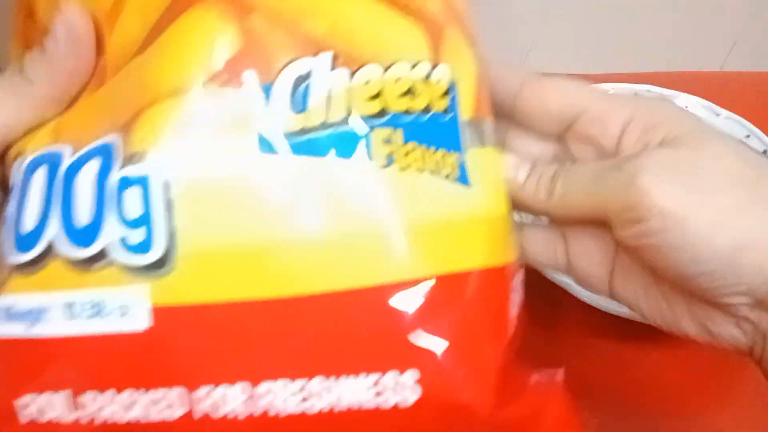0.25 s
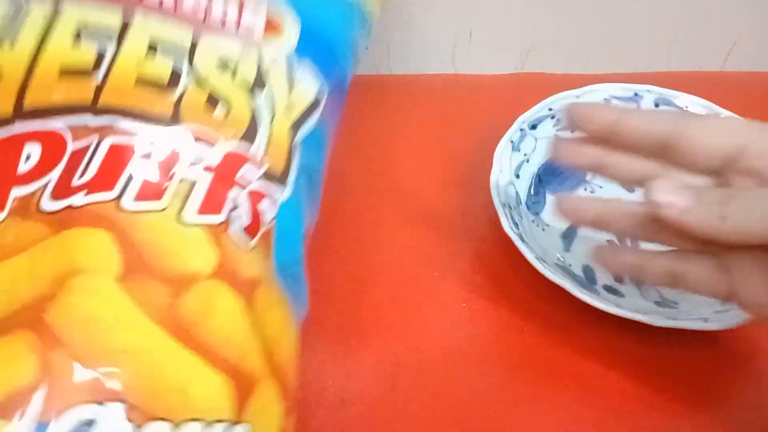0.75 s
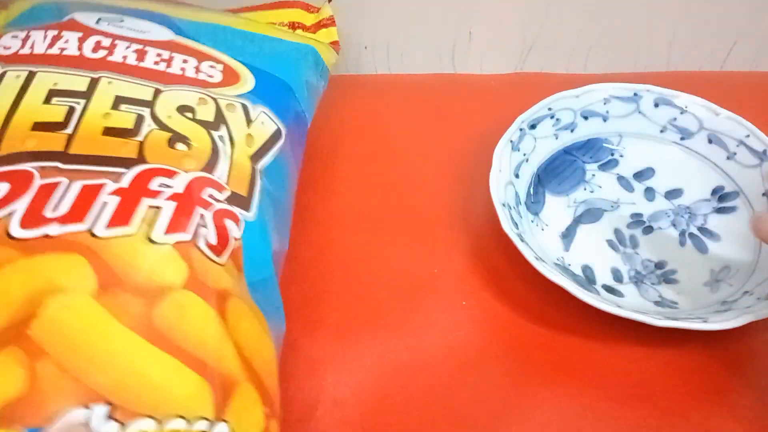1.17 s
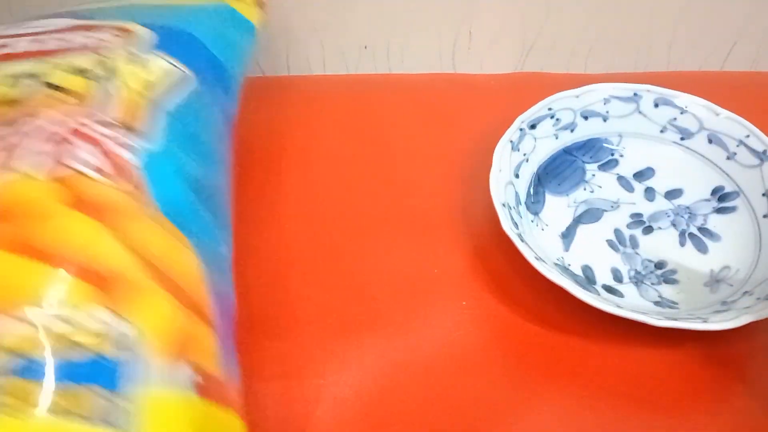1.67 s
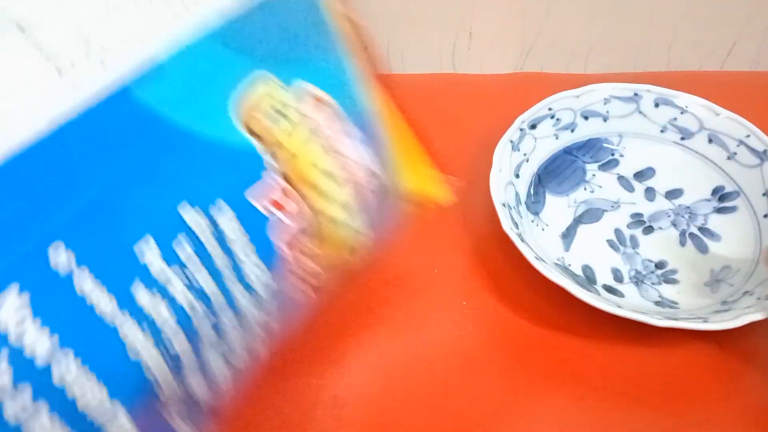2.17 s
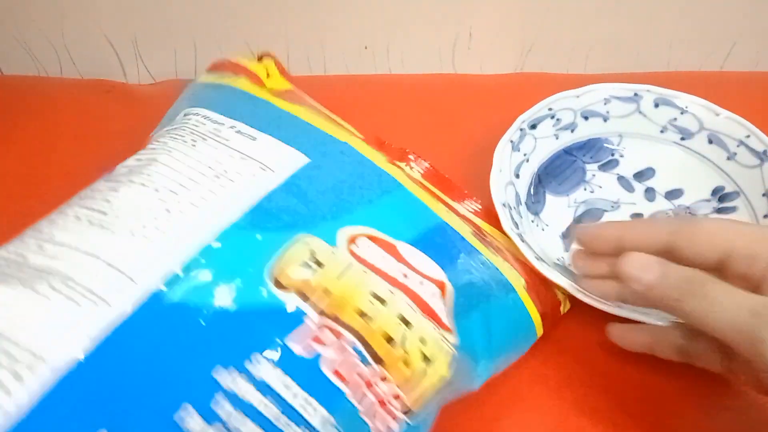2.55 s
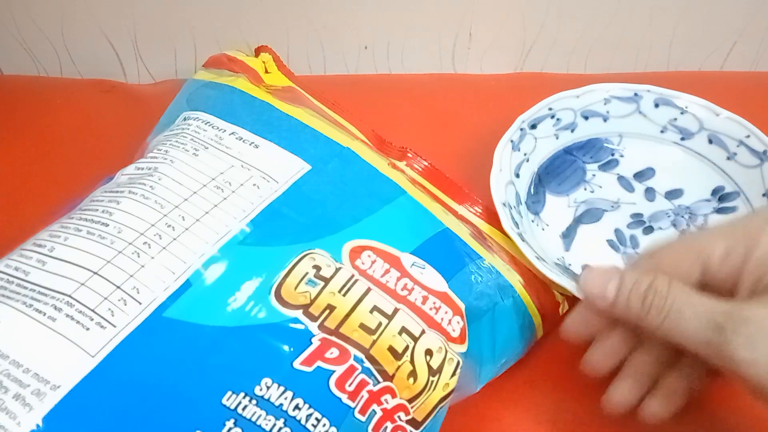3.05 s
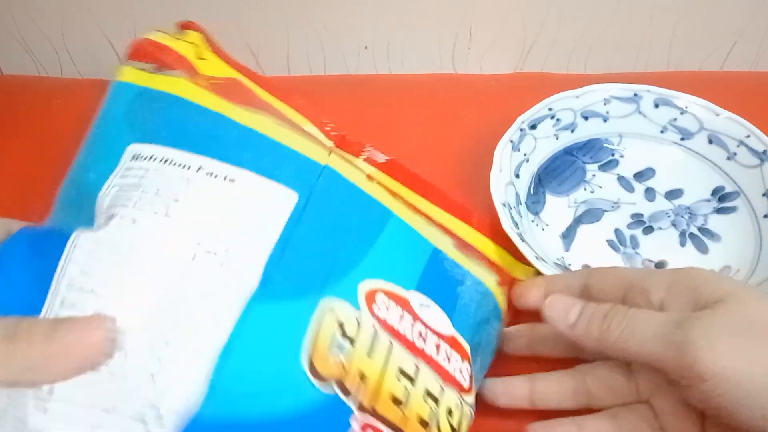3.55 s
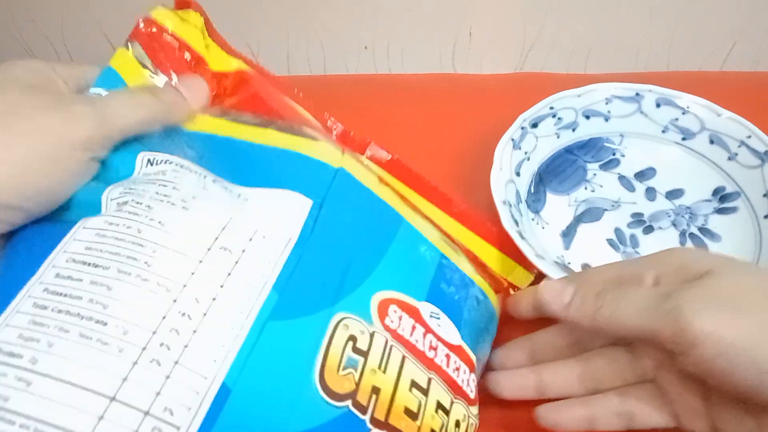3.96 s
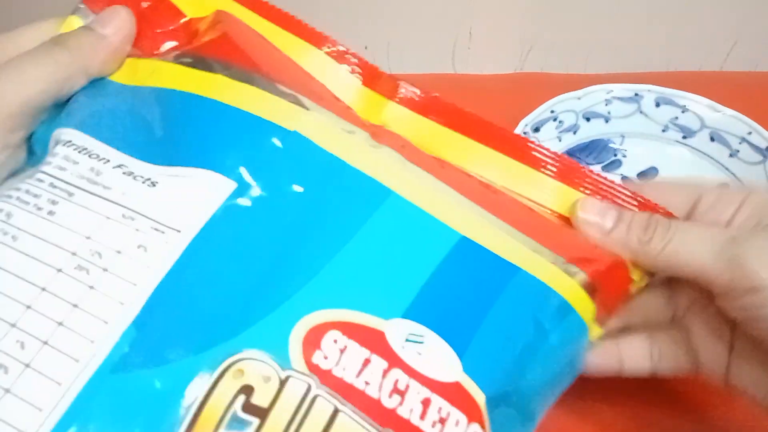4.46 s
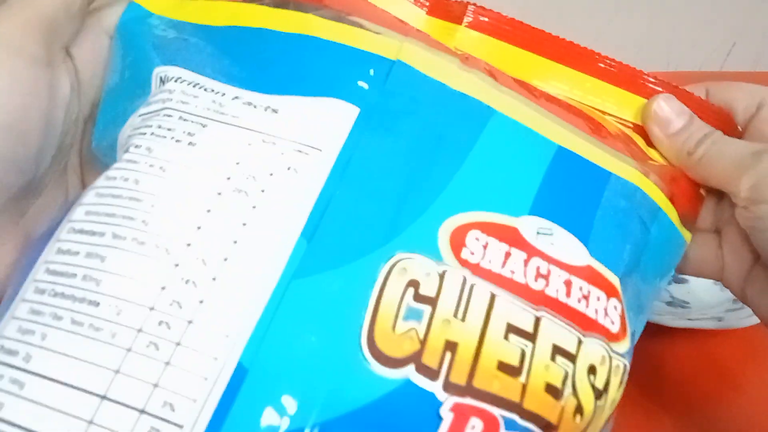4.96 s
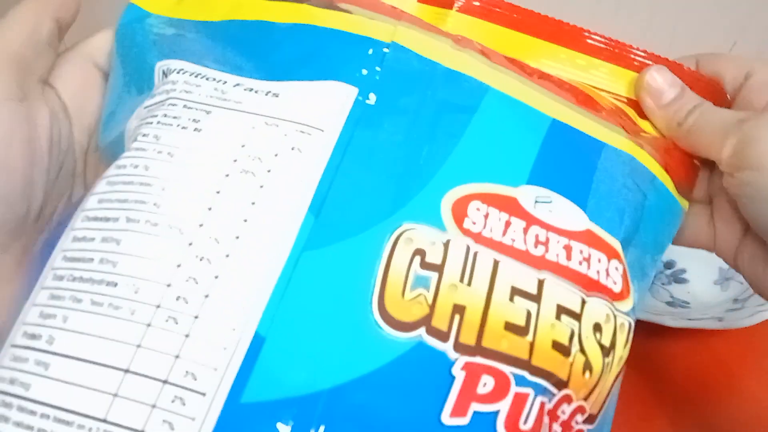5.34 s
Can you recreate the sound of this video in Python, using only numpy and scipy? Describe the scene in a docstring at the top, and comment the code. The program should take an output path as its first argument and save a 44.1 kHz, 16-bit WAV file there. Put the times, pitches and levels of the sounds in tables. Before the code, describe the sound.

A puffed-up foil snack bag is handled close up, crackling in sharp uneven bursts with soft low air thuds between near-quiet pauses.

```python
"""A soft thud of sealed air comes first, with faint crinkling: a puffed-up foil snack bag is lifted,
turned over and gripped close to a microphone in a small room. Creases snap as noise bursts ringing their
panels and folds, over a finer crinkle of tiny grains and the hiss of sliding fingers. The air inside thuds
as sagging low tones and rumbles as shaped noise when hands and table bump it. At the end single creases pop."""
import sys
import numpy as np
from scipy import signal
from scipy.fft import rfft, irfft
from scipy.io import wavfile
from scipy.ndimage import uniform_filter1d

SR = 44100
rng = np.random.default_rng(int(sys.argv[2]) if len(sys.argv) > 2 else 0)


def output_pcm(signal):
    """Save a mono or channel-first signal as 16-bit PCM at the path in sys.argv[1].

    Samples are clipped to [-1, 1] before scaling.
    """
    pcm = np.clip(np.atleast_2d(signal).T, -1, 1) * 32767
    wavfile.write(sys.argv[1], SR, np.round(pcm).astype(np.int16))


N = 246959

# slackness of the film, loose wide panels add depth and a taut bag has none:
# time_s, low_note_gain_db (on the lowest panel notes)
SLACKNESS = [(0, -8), (.8, -0.5), (1, -12), (1.3, -1), (1.9, -6), (2.35, 3.5), (2.7, -2.5), (3.2, -7),
             (3.5, -2.5), (3.85, -2.5), (4.05, 0), (4.45, 0), (4.62, -3.5), (4.7, 1.5), (4.76, -6),
             (4.93, -1), (5.2, -8.5), (5.6, -10)]
PANEL_HZ = 1400  # pitch of a middling panel


def amp(db):
    """Turns dB into a factor on the amplitude."""
    return 10 ** (np.asarray(db) / 20)


def evened(x):
    """Scales to rms 1 along the last axis."""
    return x / np.sqrt(np.mean(x ** 2, -1, keepdims=True) + 1e-20)


def smoothed(x, first, second):
    """Runs two moving averages, of first and second samples."""
    return uniform_filter1d(uniform_filter1d(x, first), second)


def steadied(x, size):
    """Holds the rms near 1 over stretches of about size samples and keeps the finer grain."""
    power = smoothed(x ** 2, size, size)
    return x / np.sqrt(abs(power) + 1e-6 * np.mean(x ** 2))


def read(points, hz):
    """Reads a spectrum joined by straight lines on a log-frequency axis."""
    point_hz, value = np.transpose(points)
    return np.interp(np.log(hz + 1), np.log(point_hz + 1), value)


def tinted(x, points):
    """Gives x the colour of a spectrum."""
    hz = np.fft.rfftfreq(len(x), 1 / SR)
    return irfft(rfft(x) * amp(read(points, hz)), len(x))


def ringing(x, hz, q):
    """One resonance of gain 1 at its peak."""
    return signal.lfilter(*signal.iirpeak(min(hz, SR * .45), max(q, 1), fs=SR), x)


def add(mix, s, sound):
    """Mixes a sound in at time s."""
    start = max(round(s * SR), 0)
    part = mix[start:start + len(sound)]
    part += sound[:len(part)]


def per_sample(values):
    """Spreads values evenly over the whole time."""
    return np.interp(np.linspace(0, len(values) - 1, N), np.arange(len(values)), values)


def strokes(rows, attack_s, release_db_per_s):
    """Each move of the hands rises, holds and lets go: rows of power, one value a millisecond."""
    start_s, length_s, level_db = np.transpose(rows)[:3, :, None]
    since_s = np.arange(0, N / SR, .001) - start_s
    rise = np.clip(since_s / attack_s, 0, 1)
    release_db = release_db_per_s * np.maximum(since_s - length_s, 0)
    return (rise * amp(level_db - release_db)) ** 2


def room_hush(level_db=-62.5):
    """The hush of the room: steady noise in a fixed colour."""
    # colour of the hush: frequency_hz, density_db (relative, per Hz)
    hush_colour = [(18, -48), (30, -14), (109, 13.5), (295, -12), (632, 0.5), (702, -24), (822, -18),
                   (1960, -8), (2170, -28), (2980, -33.5), (4080, -46), (5450, -16), (6210, -28),
                   (8520, -17.5), (16000, -85)]
    return amp(level_db) * evened(tinted(rng.standard_normal(N), hush_colour))


def room(x, first_ms=4):
    """Dense reflections from table and walls, each band dying at its own speed."""
    # reverberation: frequency_hz, t60_s (time to fall 60 dB)
    decay_times = [(150, 0.22), (1000, 0.2), (3000, 0.15), (6000, 0.2), (14000, 0.17)]
    size = SR // 2
    sparse = rng.random(size) < .12
    late = np.arange(size) > first_ms * SR / 1000
    taps = rng.standard_normal(size) * sparse * late
    hz, t, bands = signal.stft(taps, SR, nperseg=256)
    fading = amp(-60 * t / read(decay_times, hz)[:, None])
    tail = signal.istft(bands * fading, SR, nperseg=256)[1]
    return signal.fftconvolve(x, tail / np.linalg.norm(tail))[:N]


def rumble(level_db=-1, scuff_db=-10, scuff_hz=330, scuff_q=2.0, hardness=0.86, lumps_db=7.5):
    """Fingers drag and jostle the cushion unevenly between the bumps; a harder push scuffs higher."""
    # pushes on the whole bag: start_s, length_s, level_db (before the lumps and the trim)
    push_rows = [(0.01, 0.041, -36.5), (0.1, 0.11, -32), (0.315, 0.11, -41), (0.5, 0.14, -28),
                 (0.74, .11, -32.5), (0.87, 0.27, -45.5), (1.21, .13, -32), (1.36, 0.66, -37.5),
                 (2.01, 0.31, -29), (2.38, 0.11, -37.5), (2.57, 0.13, -31.5), (3.06, 0.047, -46),
                 (3.22, 0.16, -30), (3.46, 0.15, -37.5), (3.61, 0.025, -26), (3.735, 0.021, -21.5),
                 (3.78, .1, -35), (3.89, .17, -42), (4.1, .1, -66), (4.315, 0.047, -36.5), (4.4, 0.3, -48),
                 (5.49, 0.057, -34.5), (5.565, 0.028, -28)]
    # colour of the air cushion: frequency_hz, density_db (relative, per Hz)
    cushion_colour = [(15, -43.5), (25, -24), (65, 3), (91, 7), (123, 5), (188, -2), (237, -1),
                      (313, -21.5), (450, -43), (580, -109), (990, -120)]
    settled_db = -72  # the bag between pushes
    power = strokes(push_rows, attack_s=0.012, release_db_per_s=305).sum(0) + amp(settled_db) ** 2
    jostle_db = per_sample(10 * np.log10(power))
    deep = steadied(tinted(rng.standard_normal(N), cushion_colour), size=1000)
    scuff = rng.standard_normal(N)
    for _ in range(3):
        scuff = ringing(scuff, scuff_hz, scuff_q)
    scuff_gain = amp(scuff_db + hardness * (jostle_db + 18.5))
    lumps = evened(smoothed(rng.standard_normal(N), 700, 500))
    uneven = amp(level_db + jostle_db + lumps_db * np.tanh(lumps))
    return uneven * (deep + scuff_gain * evened(scuff))


def thuds(swell_ms=4.78, sag=0.35, skin_db=-14, skin_ratio=1.8, skin_ms=7):
    """A push on the sealed air: a few low cycles that sag in pitch, and a short higher mode of the taut skin."""
    # bumps on the air cushion: time_s, level_db (crest of the air tone), pitch_hz (middle of the sag)
    bump_rows = [(0.032, -17.5, 140), (0.167, -24.5, 140), (0.187, -20.5, 151), (0.32, -21.5, 100),
                 (0.545, -17, 123), (0.589, -18, 155), (0.631, -16.5, 117), (0.751, -19.5, 145),
                 (0.783, -11, 133), (0.83, -16.5, 164), (1.265, -18.5, 147), (1.837, -19.5, 135),
                 (2.014, -15.5, 151), (2.04, -12, 132), (2.074, -14.5, 156), (2.139, -16.5, 118),
                 (2.189, -14, 112), (2.229, -17, 195), (2.266, -13.5, 107), (2.301, -17, 111),
                 (2.286, -24, 102), (2.396, -16.5, 144), (2.56, -24, 180), (2.604, -15, 119),
                 (2.654, -30, 133), (2.691, -19.5, 119), (3.1, -32.5, 112.7), (3.255, -14, 190),
                 (3.362, -17.5, 160), (3.379, -18, 170), (3.629, -19.5, 172), (3.74, -5, 181),
                 (3.777, -14, 150), (3.795, -16.5, 175), (3.927, -19, 312), (5.589, -18, 117)]
    out = np.zeros(N)
    t = np.arange(SR // 12) / SR
    ms = t * 1000
    u = ms / swell_ms
    swell = (u * np.exp(1 - u)) ** 2.7
    sagging = 1 + sag * (2 * np.exp(-u / 2) - 1)
    for s, db, hz in bump_rows:
        turns = np.cumsum(hz * sagging) / SR
        air = np.sin(2 * np.pi * (turns + rng.random()))
        skin = np.sin(2 * np.pi * (skin_ratio * turns + rng.random()))
        skin = amp(skin_db) * np.exp(-ms / skin_ms) * skin
        add(out, s - .002, amp(db) * swell * (air + skin))
    return out


def squeaks(waver=0.019, rough=0.45):
    """Skin sticks and slips on the film in a short, uneven, wavering tone."""
    # faint thin squeaks as the grip tightens: start_s, length_s, pitch_hz, level_db (rms)
    squeak_rows = [(4.962, 0.14, 1070, -56.5), (5.211, 0.034, 1230, -50.5), (5.556, 0.048, 1770, -58)]
    out = np.zeros(N)
    for s, length_s, hz, db in squeak_rows:
        size = int(length_s * SR)
        drift, catch = evened(uniform_filter1d(rng.standard_normal((2, size)), size=300))
        phase = 2 * np.pi * np.cumsum(hz * (1 + waver * drift)) / SR
        tone = np.sin(phase) * (1 + rough * catch)
        add(out, s, amp(db) * evened(tone * signal.windows.tukey(size, .4)))
    return out


def film_zones(x, low_hz=340):
    """Colours x as the film radiates it and splits it into body, mid, edge and air."""
    # colour of the film: frequency_hz, density_db (relative, per Hz)
    film_colour = [(150, -22.5), (250, 10.5), (414, 3), (476, -1.5), (586, -2), (831, -1), (1060, -2.5),
                   (1500, -2.5), (2320, -8), (3340, -2), (4190, -1), (5630, 0.5), (9330, -8.5), (14900, -8),
                   (16000, -7.5)]
    # broad resonances that colour every crackle: frequency_hz, width_hz, gain_db
    resonances = [(3560, 560, -1), (4200, 540, -5.5), (5850, 4500, -1.5), (7240, 460, 0.5),
                  (8320, 740, 3.5)]
    # centres of body, mid, edge and air: frequency_hz
    centres_hz = [800, 2400, 6000, 12000]
    hz = np.fft.rfftfreq(len(x), 1 / SR)
    colour_db = read(film_colour, hz)
    for centre_hz, width_hz, db in resonances:
        colour_db = colour_db + db * np.exp(-((hz - centre_hz) / width_hz) ** 2)
    low_cut = 1 / np.sqrt(1 + (low_hz / (hz + 1)) ** 10)
    spectrum = rfft(x) * amp(colour_db) * low_cut
    # neighbouring zones cross-fade
    shares = [np.interp(np.log(hz + 1), np.log(centres_hz), w) for w in np.eye(len(centres_hz))]
    return np.array([irfft(spectrum * share, len(x)) for share in shares])


def buckle(decay_ms, flutter, after_db=-21, after_ms=5, size=1024):
    """A crease flips with one impulse; the film flutters briefly and then settles."""
    ms = np.arange(size) * 1000 / SR
    settling = np.exp(-ms / decay_ms) + amp(after_db) * np.exp(-ms / after_ms)
    burst = flutter * rng.standard_normal(size) * settling
    burst[0] += rng.choice([-1, 1])
    return burst


def flexing():
    """How hard the grips flex the film and how brightly it answers, both in dB."""
    # each grip or slide of the hands: start_s, length_s, level_db (drive, before each layer's trim),
    # brightness_db (raises edge and air, lowers body)
    grip_rows = [(0.0, 0.27, -67, -5), (0.113, 0.093, -62, 7), (0.204, 0.078, -55.5, 3.5),
                 (0.289, .05, -56, 6), (0.328, .09, -45, 1), (0.479, .06, -52, 2.5),
                 (0.56, 0.076, -61, 0.5), (0.642, 0.16, -67.5, -2), (0.763, 0.051, -42, -0.5),
                 (0.867, 0.1, -42.5, -1), (1.005, 0.049, -41, 0.5), (1.16, 0.095, -38.5, 0),
                 (1.253, 0.082, -33, 0.5), (1.367, 0.11, -32.5, 2), (1.5, 0.15, -42, 3),
                 (1.636, 0.42, -42, 1.5), (1.796, 0.066, -30, 0), (1.874, 0.12, -33, -1),
                 (1.916, 0.12, -30, 1.5), (2.058, 0.18, -42.5, 1), (2.214, 0.058, -35, 2),
                 (2.31, 0.097, -38, -0.5), (2.426, 0.15, -47.5, 1.5), (2.605, 0.07, -36, -1.5),
                 (3.188, .025, -57, -2), (3.205, 0.045, -40.5, -4.5), (3.25, 0.036, -35.5, 1),
                 (3.302, .11, -39, -1), (3.447, 0.1, -34.5, 0.5), (3.55, 0.069, -38.5, -0.5),
                 (3.621, 0.029, -33.5, -1.5), (3.688, 0.029, -46, -3.5), (3.801, 0.15, -35, -2),
                 (3.892, .15, -32, 0), (4.077, .12, -40, 0.5), (4.218, 0.078, -53, 3),
                 (4.307, 0.021, -35, 1.5), (4.384, 0.2, -44.5, 0), (4.554, 0.079, -43.5, -4),
                 (4.672, 0.038, -45.5, -0.5), (4.739, 0.056, -46.5, 1.5), (4.897, .04, -51, 0.5),
                 (5.498, 0.11, -59.5, -1)]
    resting_db, resting_bright_db = -72, -5  # the film barely creeps in still hands
    power = strokes(grip_rows, attack_s=.02, release_db_per_s=277)
    rest = amp(resting_db) ** 2
    total = power.sum(0) + rest
    bright_db = (np.transpose(grip_rows)[3] @ power + resting_bright_db * rest) / total
    return per_sample(10 * np.log10(total)), per_sample(bright_db)


def cavity(x, depth=2.4, fade_ms=6.2, longest_ms=7, shift_per_s=8, below_hz=3800, count=28):
    """Echoes inside the bag swell and fade as it changes shape, so its resonances keep shifting."""
    t, echoes = np.arange(N) / SR, np.zeros(N)
    delays_ms = (np.arange(count) + rng.random(count)) * longest_ms / count
    weights = np.exp(-delays_ms / fade_ms)
    weights = weights / np.linalg.norm(weights)
    shapes = rng.standard_normal((count, 200))
    for ms, weight, shape in zip(delays_ms, weights, shapes):
        strength = np.interp(t * shift_per_s, np.arange(len(shape)), shape)
        delayed = np.pad(x, (int(ms * SR / 1000) + 1, 0))[:N]
        echoes += weight * strength * delayed
    # the filling soaks up the treble
    soaked = signal.lfilter(*signal.butter(1, min(below_hz, SR * .4), fs=SR), echoes)
    return x + depth * soaked


def slackened(x, corner_hz=680):
    """The lowest notes of the film come and go with its slackness."""
    slack_db = np.interp(np.arange(N) / SR, *np.transpose(SLACKNESS))
    hz = np.fft.rfftfreq(N, 1 / SR)
    lowest = irfft(rfft(x) / (1 + (hz / corner_hz) ** 8), N)
    return x + (amp(slack_db) - 1) * lowest


def crinkle(level_db=-1, body_db=4, edge_db=-0.5, air_db=-7.5, per_s=560, crowding=0.38, spread_db=5,
            slide=0.4, gentle=0.098, grain_ms=0.96, own_db=8, count=32):
    """Swarms of tiny creases, denser as the film flexes harder; a gentle touch mostly slides and hisses."""
    flex_db, bright_db = flexing()
    rate = per_s * amp(crowding * (flex_db + 40.5))
    strikes = rng.random(N) < rate / SR
    clicks = strikes * amp(spread_db * np.minimum(rng.exponential(1, N), 4))
    crease = rng.integers(0, count, N)
    swarm = np.zeros(N)
    for k in range(count):
        # every crease favours a pitch of its own
        own_hz = np.exp(rng.uniform(np.log(700), np.log(11000)))
        grain = buckle(grain_ms * rng.uniform(0.1, 1.8), flutter=0.26)
        grain = grain + amp(own_db) * ringing(grain, own_hz, 7.5)
        swarm += signal.oaconvolve(clicks * (crease == k), evened(grain))[:N]
    hiss = slide * amp(-gentle * (flex_db + 29)) * rng.standard_normal(N)
    inside = cavity(cavity(evened(swarm) + hiss), depth=.5)
    # level steadied first, so that the grips alone shape the loudness
    zones = steadied(film_zones(inside), size=1100)
    balance_db = np.array([body_db - bright_db, np.zeros(N), edge_db + bright_db, air_db + bright_db])
    return amp(level_db) * (amp(flex_db + balance_db) * zones).sum(0)


def snap(s, db, bright_db, top_db, decay_ms, panel_hz, flutter=0.54, panel_db=10, panel_q=8, fold_db=3,
         fold_q=5, fold_lean=.6, slack_hz=370, tautening=0.97, mid_db=-1.0, thinning=0.53, rising=0.25):
    """One large crease rings its panel and its folds: wide panels are deep, small ones thin, tight folds bright."""
    lead, span = 128, .005 * SR  # samples of silence ahead, samples the level refers to
    fold_hz, tight_fold_hz = rng.uniform(0.91, 1.093) * np.array([3300, 5430])
    burst = buckle(max(decay_ms, .1), flutter)
    # the brighter the crease, the more its tight fold leads
    lean = amp(fold_lean * bright_db)
    folds = ringing(burst, fold_hz, fold_q) + lean * ringing(burst, tight_fold_hz, fold_q)
    folds = amp(fold_db) * folds / np.hypot(1, lean)
    burst = burst + amp(panel_db) * ringing(burst, panel_hz, panel_q) + folds
    # the tauter the film and the smaller the panel, the higher its lowest note
    small_db = 20 * np.log10(panel_hz / PANEL_HZ)
    slack_db = np.interp(s, *np.transpose(SLACKNESS))
    lowest_hz = slack_hz * amp(rising * small_db - tautening * slack_db)
    zones = film_zones(np.pad(burst, lead), lowest_hz)
    zones *= np.sqrt(span) / np.linalg.norm(zones, axis=1, keepdims=True)
    thin_db = thinning * small_db
    zones_db = np.array([-bright_db - thin_db, mid_db + thin_db, bright_db, top_db])
    return s - lead / SR, amp(db + zones_db) @ zones


def crackles(spread_db=3, bright_spread_db=4, top_db=-9, top_spread_db=7, decay_ms=1.7, octaves=.7,
             least_db=-66, count=130):
    """Middling creases give way at random while the film is flexed, their levels scattered around the flexing."""
    flex_db, bright_db = flexing()
    out = np.zeros(N)
    for k, (when, size, tilt, top, pitch) in enumerate(rng.uniform(-1, 1, (count, 5))):
        at = int((k + (when + 1) / 2) * N / count)
        s, sound = snap(at / SR,
                        flex_db[at] + spread_db * size,
                        bright_db[at] + bright_spread_db * tilt,
                        top_db + top_spread_db * top,
                        decay_ms,
                        PANEL_HZ * 2 ** (octaves * pitch))
        add(out, s, sound * (flex_db[at] > least_db))
    return out


def snaps():
    """The large creases, one after another."""
    # the loudest buckling creases: time_s, level_db (rms over 5 ms, before the zone balance),
    # brightness_db (raises edge, lowers body), top_treble_db (air relative to the level),
    # decay_ms, pitch_hz (of the panel)
    crease_rows = [(0.2055, -49, 7.5, 6, 1.1, 1650), (0.3492, -43, 12.5, 6, 1.1, 920),
                   (0.3597, -36.5, 9, 0, 2, 1260), (0.3674, -36, 4, -9, 1.8, 1260),
                   (0.4035, -33.5, 2, 3, 1.8, 1350), (0.4116, -33.5, 2.5, -7, 3.6, 1440),
                   (0.7872, -18, -0.5, -2, 1.9, 1076), (0.9383, -33, 0.5, -16, 4, 1520),
                   (1.0634, -35.5, 1, -7.5, 2.7, 1460), (1.1699, -39, -1, -7, 2.3, 1130),
                   (1.2172, -30.5, 6.5, -6.5, 2.6, 1080), (1.2336, -31, 7.5, 6, 1, 2430),
                   (1.2506, -26, -0.5, -10, 1.7, 1190), (1.2795, -24.5, 3.5, -12, 4, 805),
                   (1.2954, -30, 3.5, 0.5, 2.5, 1250), (1.3663, -28, 6, -1, .5, 1580),
                   (1.4037, -26, -2.5, 5.5, 2.4, 2600), (1.4247, -26.5, 7.5, -4, 1.1, 1670),
                   (1.4823, -22, 4, -6, 4, 2350), (1.4935, -24, 1.5, 2.5, 2.1, 1150),
                   (1.531, -24, 3, 4.5, 1.3, 2670), (1.6745, -31, 3, 0.5, 1.8, 2650),
                   (1.774, -28.5, -2.5, -11, 1.4, 1060), (1.8034, -25.5, 1.5, -10, 1.4, 1900),
                   (1.8194, -29, 6, 0, 4, 1530), (1.849, -24, 0.5, -16, 1, 745),
                   (2.0466, -31, 5.5, 0, 1.6, 1500), (2.0879, -30, 4.5, -2, 2.2, 1370),
                   (2.224, -23, -0.5, 1, 2.6, 2550), (2.246, -32, 5.5, 1.5, 1.3, 1110),
                   (2.1585, -32.5, -1.5, -18, 3.4, 1280), (2.3389, -31.5, 1.5, 4, 2.6, 596),
                   (2.372, -29, -6, -6, 0.81, 2780), (2.6131, -36.5, 5.5, -2, 2.9, 1900),
                   (2.6724, -25.5, 2.5, -15, 3.1, 980), (3.1875, -52, -7, -30, 2.5, 2620),
                   (3.214, -35.5, -1, -46, 1.3, 2650), (3.266, -31.5, 9.5, -9, .5, 2560),
                   (3.277, -26.5, -3, -6, 1.8, 2800), (3.2882, -28.5, -6.5, -10, 2, 1520),
                   (3.412, -27, -2, -1, 2.8, 960), (3.462, -29.5, -2, -14, 1.4, 795),
                   (3.4744, -28.5, -3.5, -5, 3.3, 790), (3.5048, -29, -3.5, -1, 1.7, 870),
                   (3.5203, -21.5, 0.5, -3.5, 4, 840), (3.6079, -24, -0.5, -9, 2.2, 1290),
                   (3.6444, -26.5, 4.5, -3, 2.3, 1600), (3.6669, -27.5, -0.5, -12, 1.6, 910),
                   (3.7211, -31.5, 4, -4, 1.1, 2650), (3.7838, -40, 0, -29.5, 1.6, 2110),
                   (3.8131, -33.5, 1.5, 4, 3.5, 860), (3.8444, -27.5, -1, -1, .7, 850),
                   (3.8534, -30, 2.5, -8, 1.4, 980), (3.9, -26, 2, -18, 2, 2070),
                   (3.9279, -22, 0.5, -4.5, 3.2, 1240), (3.9567, -26, 6, 3, 2, 1810),
                   (3.9758, -35.5, -2, -2, 2.3, 1340), (3.992, -27, 0.5, -7, 1.2, 1080),
                   (4.021, -28, 0, -12, 1, 925), (4.038, -22, -2, 0.5, 1.5, 2150),
                   (4.0455, -26, 4, -6.5, 3.4, 1250), (4.1543, -27.5, -5, -11, 3.7, 1270),
                   (4.1872, -26.5, 1, 5.5, 1.9, 990), (4.3238, -20.5, 2.5, -8.5, 3.2, 1440),
                   (4.337, -32.5, 11, -18, 1.5, 1200), (4.391, -33, 2.5, -23, 1, 1970),
                   (4.4084, -40, 7, -22.5, 1.5, 880), (4.4182, -25.5, -1, -10, 2.7, 1010),
                   (4.474, -39, 10.5, 8.5, 1.9, 1430), (4.489, -29.5, 5.5, -2.5, 1.7, 2260),
                   (4.5063, -23, 3.5, -10, 4, 1020), (4.5739, -33, 1.5, -11, 1.7, 1330),
                   (4.614, -29, -11, -16, 3.5, 2060), (4.6169, -22.5, -2.5, -21, 1.3, 2300),
                   (4.697, -34.5, -1, -19, 2.1, 1790), (4.7646, -31.5, 6.5, -17, .6, 2770),
                   (4.9137, -45, 22, 22, 1, 1800), (4.943, -46, 9, -17, 1.9, 1470),
                   (5.2143, -37, 4.5, 0, 1.9, 2530), (5.4038, -44, 4, -7.5, 2.1, 2000),
                   (5.5599, -48, 13.5, 13, 2, 2700)]
    out = np.zeros(N)
    for row in crease_rows:
        add(out, *snap(*row))
    return out


def scene(snap_room_db=-11, crinkle_room_db=-14, thud_room_db=-17):
    """The bag close by, its echo, and the hush of the room."""
    big = snaps() + crackles()
    fine = slackened(crinkle())
    low = thuds() + rumble()
    echo = room(amp(snap_room_db) * big + amp(crinkle_room_db) * fine + amp(thud_room_db) * low)
    return (big + fine + low + squeaks() + echo + room_hush())[None]


def record(dry, low_cut_hz=42, top_hz=15800):
    """The microphone sheds the deepest bass and rounds off the hardest peaks; then the band limit."""
    thinned = signal.sosfilt(signal.butter(4, low_cut_hz, "high", fs=SR, output="sos"), dry)
    rounded = thinned / (1 + (thinned / .85) ** 6) ** (1 / 6)
    band_limit = signal.firwin(255, top_hz, window=("kaiser", 8), fs=SR)
    return signal.oaconvolve(rounded, band_limit[None], "same")


dry = scene()
out = record(dry)
output_pcm(out)
```